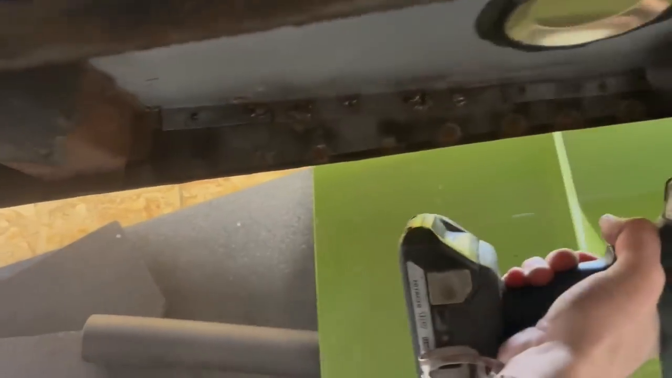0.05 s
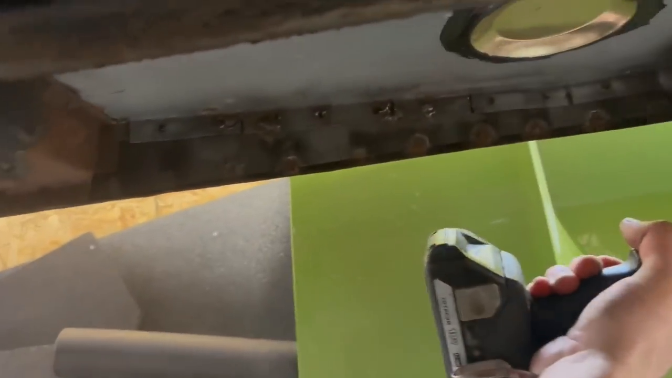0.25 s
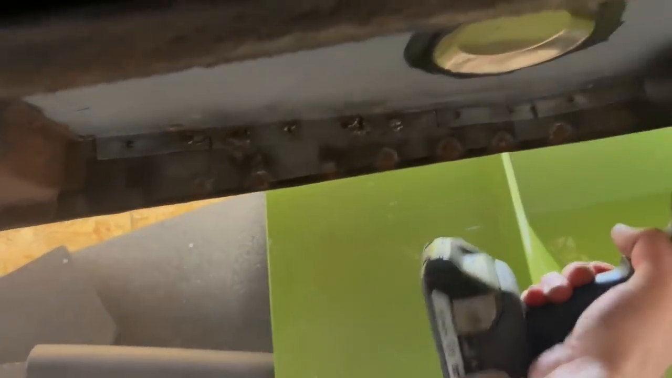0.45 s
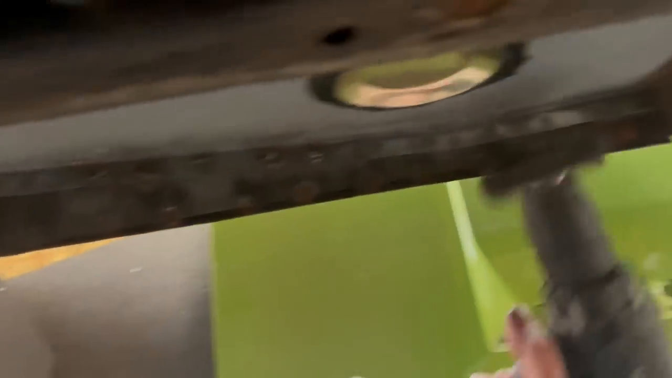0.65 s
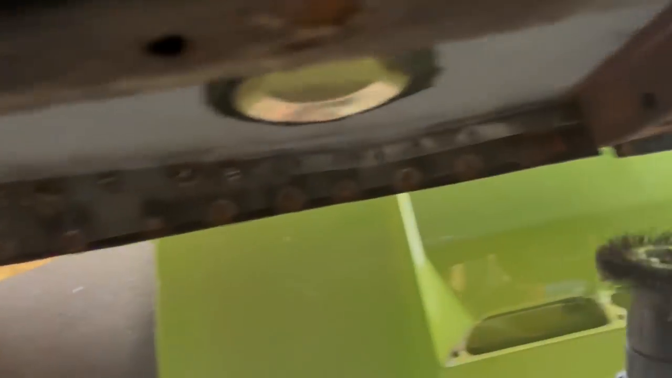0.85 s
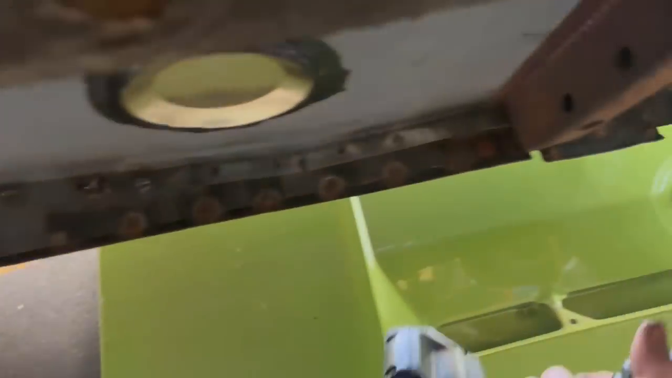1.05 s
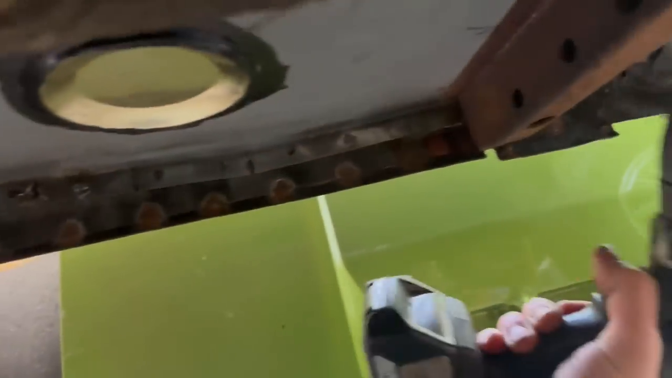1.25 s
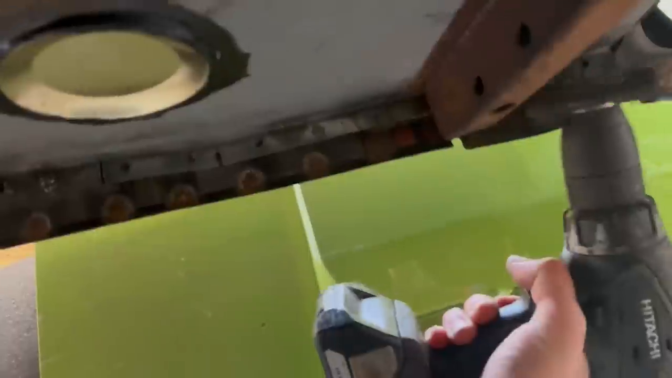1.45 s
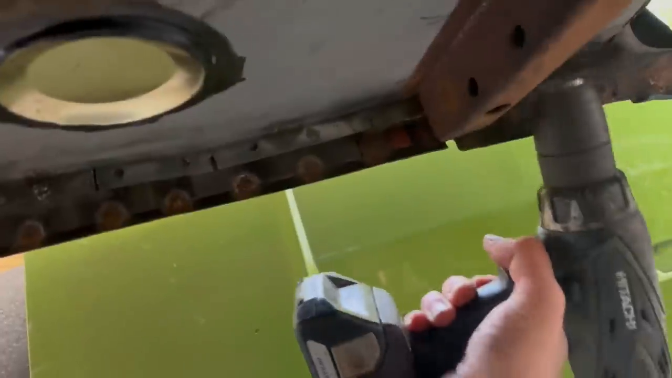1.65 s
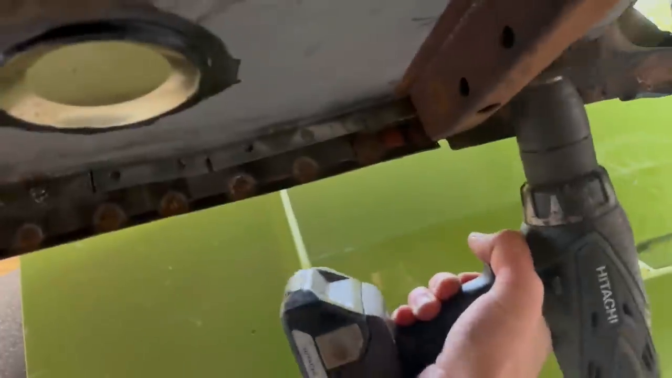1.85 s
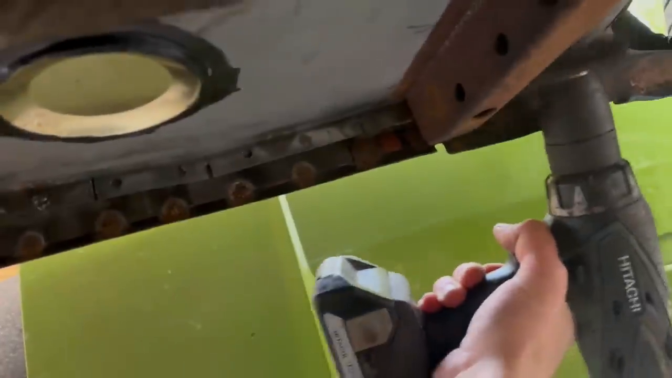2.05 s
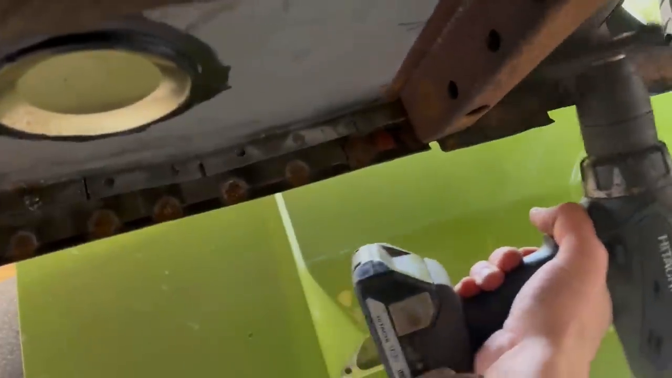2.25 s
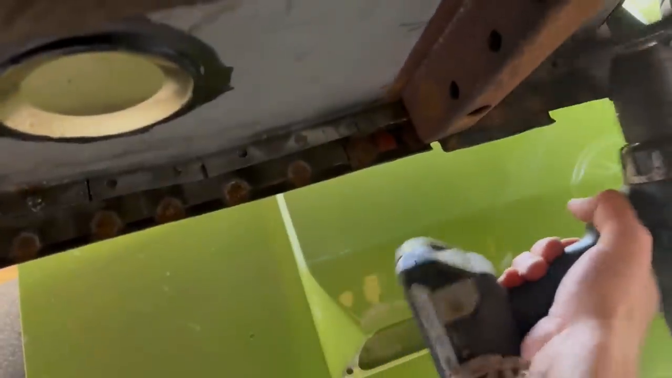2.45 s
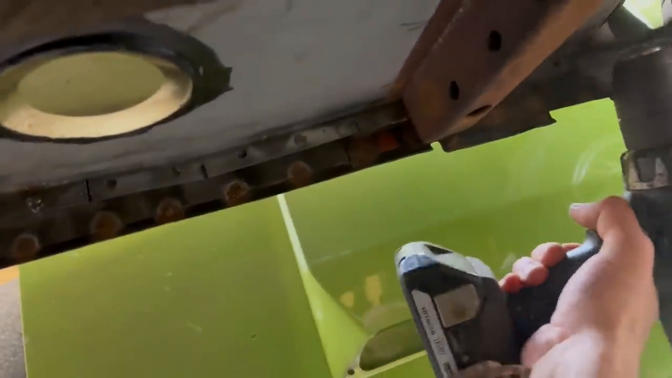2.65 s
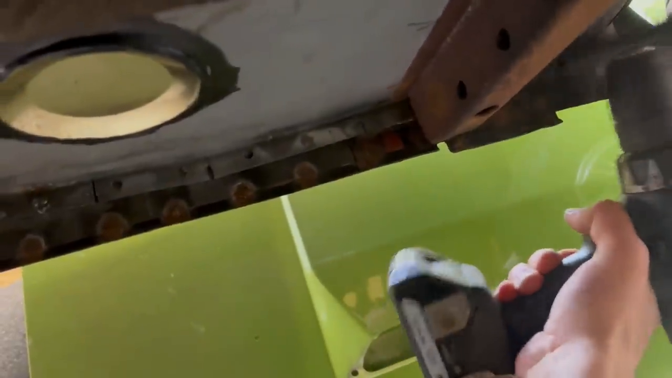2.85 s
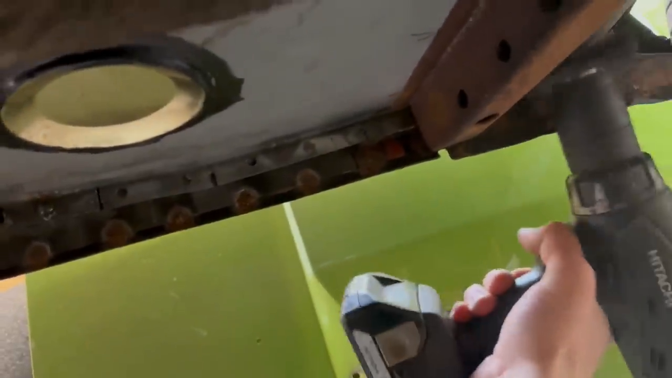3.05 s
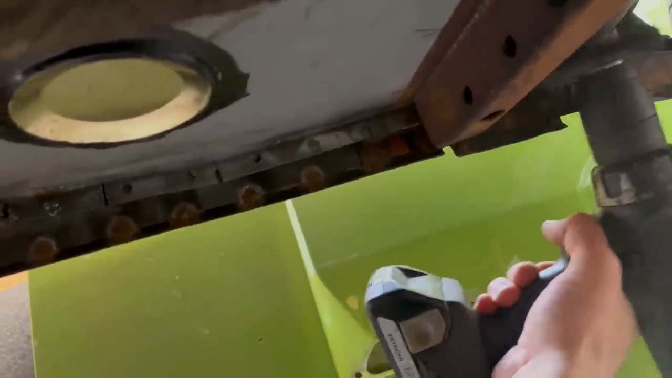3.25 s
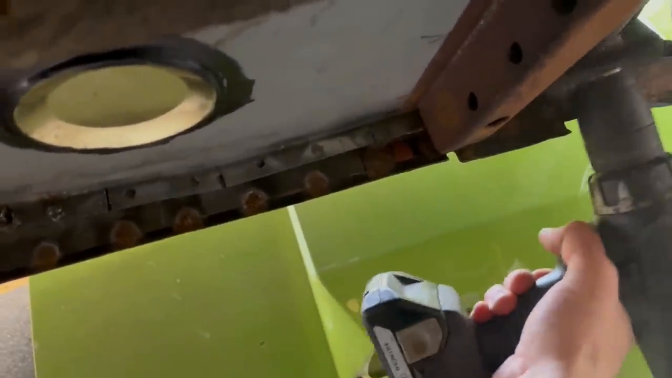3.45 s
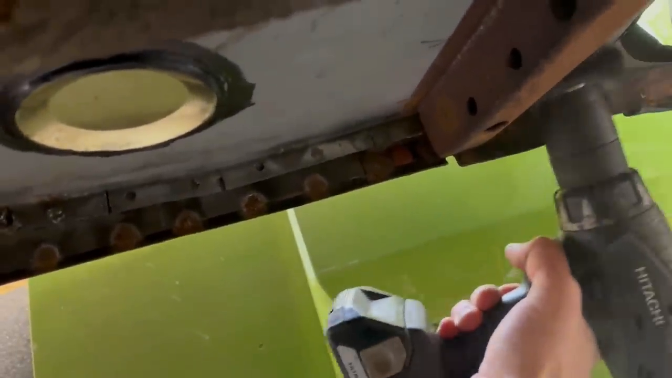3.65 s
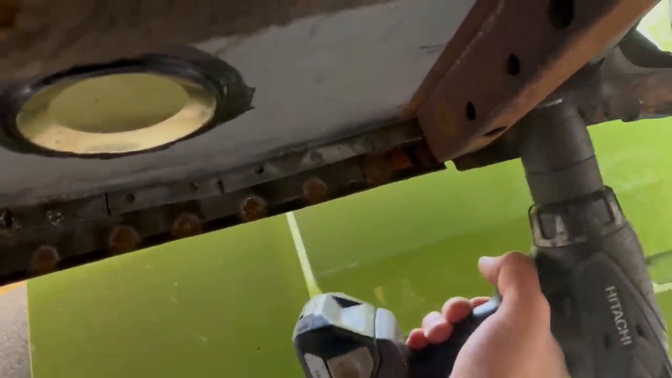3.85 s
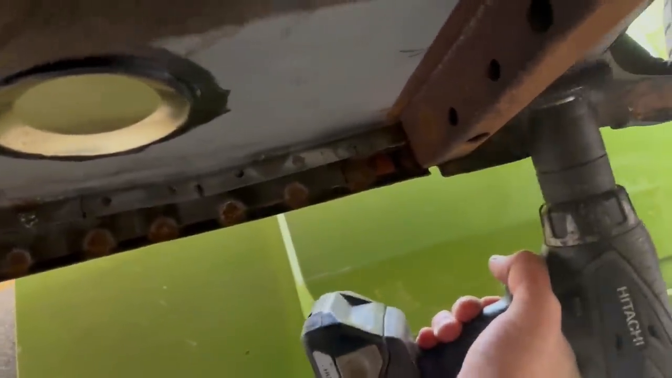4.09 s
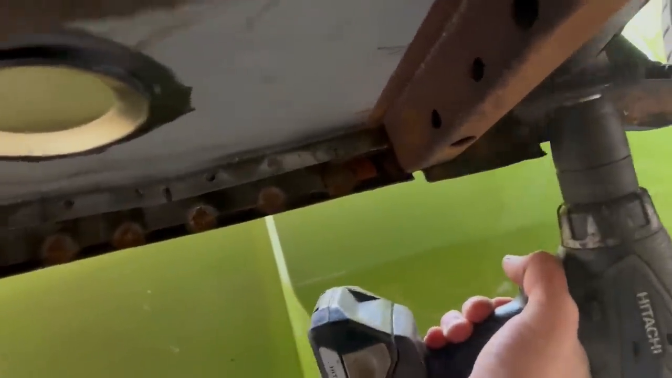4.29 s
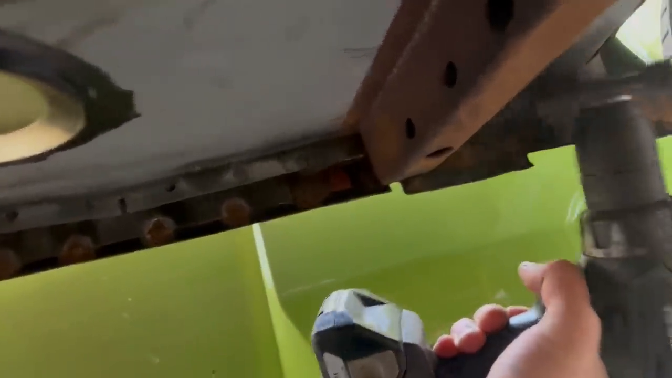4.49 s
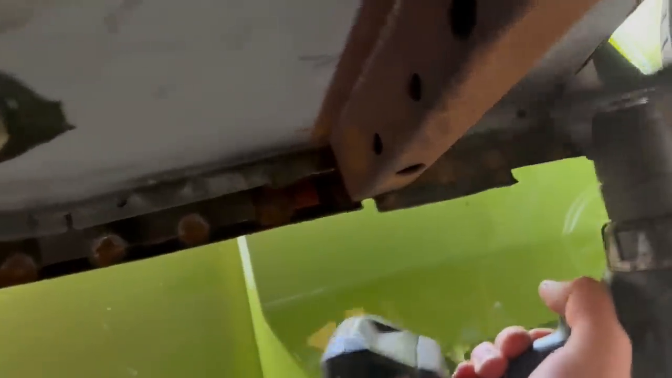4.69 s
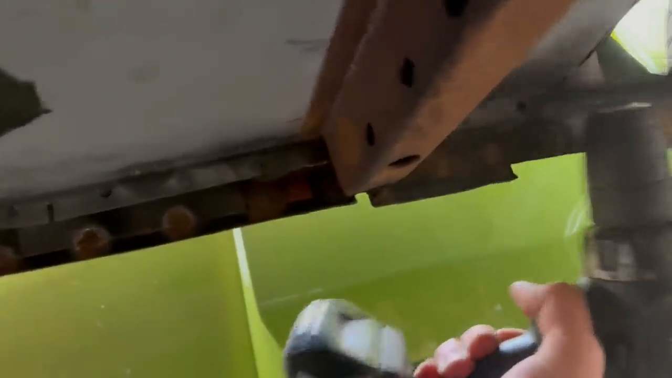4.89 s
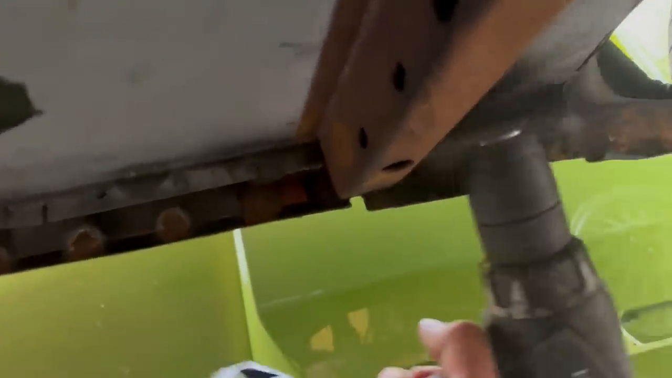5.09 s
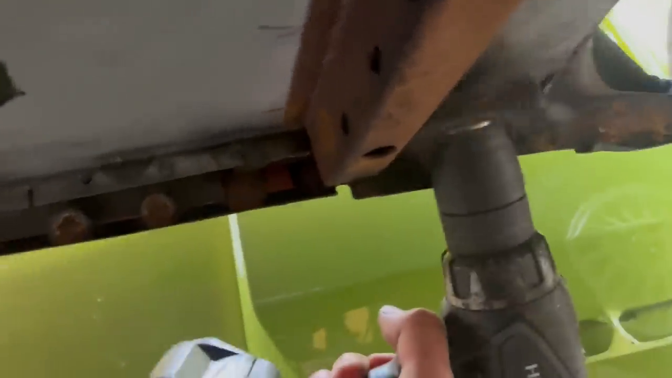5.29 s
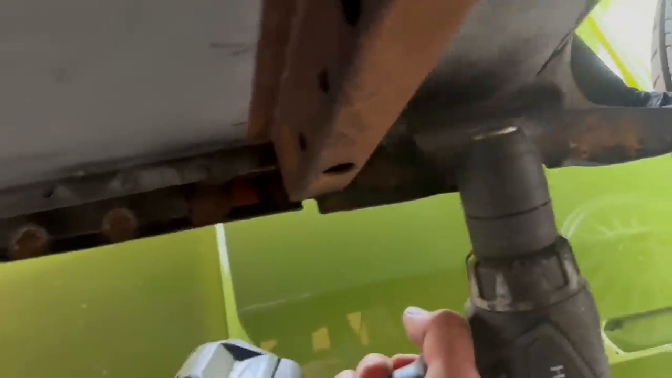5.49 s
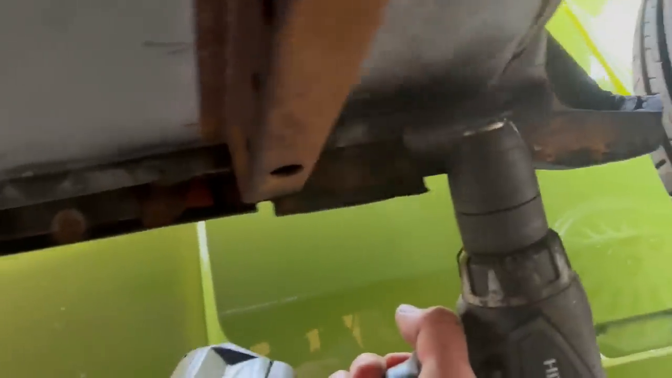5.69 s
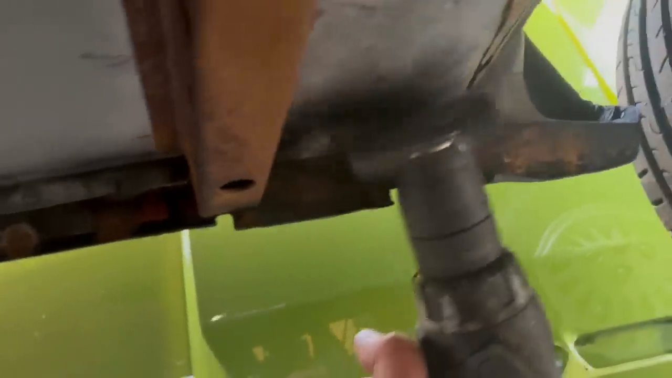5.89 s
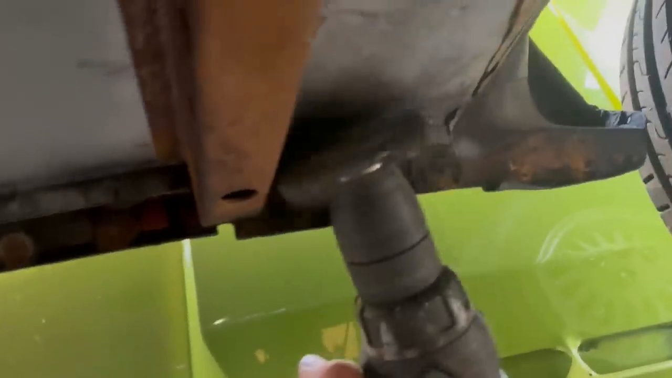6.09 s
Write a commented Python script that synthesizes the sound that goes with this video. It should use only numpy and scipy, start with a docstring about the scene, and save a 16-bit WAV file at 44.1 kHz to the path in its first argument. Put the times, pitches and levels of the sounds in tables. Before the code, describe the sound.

A cordless drill whines as its wire brush scrapes rusty steel under a car, stopping briefly with a clack, then restarting.

```python
"""A whirring, whining drill and the harsh hiss of a wire brush on rusty steel, under a car in a garage.
The cordless drill stops with a clack, ticks as it is moved, and starts again. Its gear teeth make the
whir and whine; the scratching wire tips make the hiss and press harder once a turn. Where the brush
catches an edge, the car's floor panel drums and a thin bracket rings. Two microphone openings (ports)
hear it all, with short echoes between car and floor."""
import sys
import numpy as np
from scipy import signal
from scipy.fft import rfft, irfft, next_fast_len
from scipy.io import wavfile

SR = 44100
rng = np.random.default_rng(int(sys.argv[2]) if len(sys.argv) > 2 else 0)


def to_wav(s):
    """Save 16-bit WAV."""
    ch = np.atleast_2d(s).T  # columns
    pcm = np.round(np.clip(ch, -1, 1) * 32767)  # PCM
    wavfile.write(sys.argv[1], SR, pcm.astype(np.int16))


N = 270333
T = np.arange(N) / SR
FFT_SIZE = next_fast_len(N + SR)
HZ = np.maximum(np.arange(FFT_SIZE // 2 + 1) * SR / FFT_SIZE, 1)
KNOCK_FIRMNESS, CLACK_FIRMNESS = .7, .15   # near 1: mostly one strike; near 0: mostly rattle

# How hard the drill works, one table per trigger pull: (time [s], gear whir [dB], brush hiss [dB])
EFFORT = [
    [(0, -35.5, -28), (.23, -36, -32.5), (.57, -38.5, -31), (.7, -38, -36), (.76, -36.5, -39),
     (.795, -31, -63)],
    [(1.366, -47, -59), (1.41, -44, -50), (1.46, -38.5, -42.5), (1.56, -30, -31.5), (1.62, -32.5, -38.5),
     (1.68, -32.5, -31.5), (1.94, -27.5, -27), (2.08, -31.5, -33.5), (2.27, -36, -30), (2.44, -31, -25.5),
     (2.62, -31.5, -29.5), (2.81, -33.5, -25), (3.09, -34, -29), (4.4, -33, -29), (4.61, -33.5, -24.5),
     (4.8, -33.5, -24), (5.14, -30.5, -27), (5.56, -31.5, -29.5), (5.92, -35, -28), (6.13, -31.5, -28)],
]
# Gear teeth meeting, one table per trigger pull:
# (time [s], tooth rate [Hz], tone at 2 times that rate [dB], at 3 times [dB], at 4 times [dB])
GEAR_TONES = [
    [(0, 1250, -44, -57, -43), (.2, 1247, -35.5, -55, -50), (.4, 1254, -52, -68, -61),
     (.65, 1240, -60, -60, -49), (.79, 1226, -52, -54, -52)],
    [(1.6, 1157, -58, -56, -48), (1.78, 1207, -56, -58, -31), (1.95, 1193, -56, -46, -47),
     (2.07, 1271, -35.5, -36, -48), (2.33, 1215, -36, -52, -57), (2.5, 1162, -45, -29.5, -46),
     (2.65, 1198, -46, -43, -36), (2.9, 1217, -43, -59, -34), (3.07, 1287, -39, -35, -50),
     (3.26, 1240, -34, -38, -41), (3.45, 1240, -37.5, -33, -36), (3.57, 1236, -36, -37, -39),
     (3.68, 1239, -36.5, -46, -36), (3.8, 1253, -35.5, -44, -54), (4.02, 1208, -37, -38, -48),
     (4.14, 1255, -33.5, -36, -37), (4.2, 1268, -37, -42, -40), (4.32, 1264, -32.5, -39, -39),
     (4.45, 1250, -39, -42, -36), (4.63, 1217, -38, -29, -48), (4.87, 1204, -47, -61, -28),
     (5.12, 1168, -47, -53, -47), (5.3, 1250, -38, -33, -53.5), (5.42, 1273, -38.5, -47, -52),
     (5.6, 1270, -45, -48, -52), (5.75, 1268, -36.5, -50, -44), (5.9, 1270, -39, -48, -38),
     (6.02, 1274, -46, -50, -41), (6.13, 1253, -42, -55, -52)],
]
# The brush catches an edge of the floor panel: (start [s], length [s], middle rings [dB],
# upper rings against middle [dB], lowest rings against middle [dB], car body rumble [dB])
EDGE_CATCHES = [(1.889, 0.04, -16.5, -1, 0, -32), (1.935, 0.021, -21, -6, 1, -27.5),
                (2.08, 0.022, -25, 1, 7, -32), (2.51, 0.057, -20, -2, -1, -26.5),
                (2.6, 0.1, -21, -4, 1.5, -25.5), (2.699, 0.04, -23, 4, 4.5, -26),
                (3.93, 0.0085, -40, 12.5, 6, -42), (4.0, 0.0092, -38.5, 11, 1, -36),
                (4.045, 0.009, -43.5, 12, 6, -38), (4.17, .04, -54, 10, -4, -36.5),
                (4.64, 0.011, -32, 5.5, 5, -47), (4.7, 0.05, -16.5, -2.5, -2, -27),
                (4.848, 0.014, -26.5, -9, 4.5, -31.5), (4.95, 0.072, -39.5, 9, 3, -41),
                (5.243, 0.013, -20, -15, -4, -46), (5.3, 0.091, -20, -2, 2.5, -35),
                (5.43, 0.075, -31, 1, 4.5, -34), (6.08, 0.054, -29.5, 3, -4, -45)]
# Clacks of the gears and the chuck (the clamp that holds the brush), and small clacks as the resting drill is
# handled near 1.03, 1.05 and 1.15 s, which also sound as ticks: # (time [s], level [dB], main ring [Hz], its
# rise time [s], thud against level [dB], other rings against level [dB])
DRILL_CLACKS = [(0.802, -5, 1500, .003, -32, -7), (0.8484, -42, 1510, .002, 6.5, -13),
                (0.8864, -54, 1830, .002, -10, -9), (0.9716, -57, 1490, .002, 1, -6),
                (1.0296, -48, 1880, .001, 8, -10), (1.052, -52, 1520, .001, 5, -8),
                (1.1505, -47, 1830, .001, 4, -6), (1.2947, -63, 1700, .002, 15, -5),
                (1.3688, -40, 1690, .002, -4, -3), (1.3983, -46, 1850, .002, -5, -1),
                (1.556, -7, 1717, .013, -44, -26), (1.572, -1, 1600, .0015, -46, -18)]


def from_db(db):
    """Turns decibels into a gain to multiply by."""
    return 10 ** (np.asarray(db) / 20)


def rms_one(x):
    """Scales a sound so that its average size (rms) is 1."""
    return x / np.sqrt(np.mean(x ** 2) + 1e-20)


def gain_curve(pulls, column):
    """Follows one dB column through time, as a gain; silent outside the trigger pulls."""
    return sum(from_db(np.interp(T, rows[:, 0], rows[:, column], -200, -200))
               for rows in map(np.array, pulls))


def over_hz(points):
    """Joins (frequency, value) points into a curve over all frequencies."""
    hz, values = np.transpose(points)
    return np.interp(np.log(HZ), np.log(np.maximum(hz, 1)), values)


def filtered(x, gains):
    """Gives each frequency of a sound its own gain."""
    return irfft(rfft(x, FFT_SIZE) * gains, FFT_SIZE)[..., :N]


def band_rms_one(x, low_hz, high_hz):
    """Scales a sound so that the part between two frequencies has rms 1."""
    band = filtered(x, (HZ > low_hz) & (HZ < high_hz))
    return x / np.sqrt(np.mean(band ** 2))


def drift(rate_hz):
    """Smooth random wandering of about plus or minus 1; a higher rate wanders faster."""
    step = 40   # samples between points
    pole = np.exp(-2 * np.pi * step * rate_hz / SR)
    noise = rng.standard_normal(N // step + 2002)
    slow = signal.lfilter([1], [1, -2 * pole, pole * pole], noise)[2000:]
    return np.interp(np.arange(N) / step, np.arange(len(slow)), rms_one(slow))


def ring(force, hz, width_hz):
    """Lets a force ring at one pitch (a resonance); a smaller width rings longer."""
    pole = np.exp(-np.pi * width_hz / SR)
    gain = (1 - pole * pole) / 2
    feedback = [1, -2 * pole * np.cos(2 * np.pi * hz / SR), pole * pole]
    return signal.lfilter([gain, 0, -gain], feedback, force + 1e-18)


def ring_all(forces, rings):
    """Adds up an object's rings, each with its own force; neighbours swing in opposite directions."""
    return sum((-1) ** k * from_db(db) * ring(forces[k], hz, width)
               for k, (hz, width, db) in enumerate(rings))


def clicks(per_s, spread_db):
    """Clicks at random times; more spread makes their sizes more uneven."""
    sizes = from_db(spread_db * np.minimum(rng.exponential(1, N), 5)) * rng.choice([-1, 1], N)
    return rms_one(sizes * (rng.random(N) < per_s / SR))


def blows(times, levels_db, contact_s, firmness):
    """The force of blows: each is a dull strike and a short rattle that dies away."""
    out, length = np.zeros(N), int(.05 * SR)
    age = np.arange(length) / SR
    rattles = np.sqrt(1 - firmness) * rng.standard_normal((len(times), length)) * np.exp(-age / contact_s)
    strike = np.exp(-2 * np.pi * 2500 * age)   # dull above 2500 Hz
    strike *= np.sqrt(firmness * contact_s * SR / 2) / strike.sum()
    for time, gain, rattle in zip(times, from_db(levels_db), rattles):
        i = round(time * SR)
        out[i:i + length] += gain * (strike + rattle)[:N - i]
    return out


def swell(starts, lengths, levels_db, rise_db_per_s, fall_db_per_s):
    """Gain of events that rise, hold and fall; the loudest one counts."""
    t = T[::16]
    events_db = [db - rise_db_per_s * np.maximum(start - t, 0)
                 - fall_db_per_s * np.maximum(t - start - length, 0)
                 for start, length, db in zip(starts, lengths, levels_db)]
    return np.interp(T, t, from_db(np.max(events_db, axis=0)))


def running():
    """1 while the trigger is pulled, otherwise 0."""
    return sum((T >= pull[0][0]) & (T <= pull[-1][0]) for pull in EFFORT)


def rotation(teeth_per_turn=63.5):
    """Two angles in radians: one goes round once per gear tooth, the other once per chuck turn."""
    times, tooth_hz = np.concatenate(GEAR_TONES).T[:2]
    unsteady_hz = np.interp(T, times, tooth_hz) * (1 + .0015 * drift(15))
    tooth_angle = 2 * np.pi * np.cumsum(unsteady_hz) / SR
    return tooth_angle, tooth_angle / teeth_per_turn


def brush_grabs(half_length_s=0.0091):
    """Extra hiss in dB where the brush bites harder for about half a turn."""
    # Bites into the steel: (middle time [s], hiss level [dB])
    bites = [(0.06, -30), (0.529, -26.5), (0.709, -28), (0.765, -28), (1.569, -25), (1.714, -25.5),
             (2.076, -22.5), (2.304, -24), (2.487, -20.5), (2.56, -18.5), (2.624, -20.5), (2.699, -23),
             (2.871, -20), (2.926, -19), (2.977, -18.5), (3.324, -24.5), (3.954, -24.5), (4.392, -23.5),
             (4.44, -32), (4.644, -16), (4.711, -18), (4.888, -19.5), (4.956, -15), (5.025, -13.5),
             (5.105, -21), (5.202, -23), (5.696, -25), (5.748, -27), (5.929, -24), (6.092, -21)]
    t = T[::16]
    bumps = [from_db(db) * np.exp(-.5 * ((t - time) / half_length_s) ** 2) for time, db in bites]
    biting = np.interp(T, t, np.max(bumps, axis=0))
    steady = gain_curve(EFFORT, 2) + 1e-5
    return 20 * np.log10(np.maximum(biting / steady, 1))


def brush_skips():
    """Short dips in dB where the brush skips off the steel."""
    # Moments of lost contact: (middle time [s], depth [dB], half length [s])
    dips = [(0.783, -15, 0.0068), (1.741, -6, 0.012), (2.602, -1, 0.011), (2.85, -7, 0.0094),
            (2.906, -5, 0.012), (2.958, -8, 0.01), (3.004, -13, 0.012), (4.673, -19, 0.019),
            (4.946, -3, 0.011), (4.986, -26, 0.014), (5.039, -15, 0.013), (5.091, -13, 0.0088),
            (5.13, -5, 0.017)]
    return sum(db * np.exp(-((T - time) / half) ** 2) for time, db, half in dips)


def garage():
    """Still air and a far hum make a quiet background."""
    # Tone colour of the quiet background noise, with a narrow dip near 8200 Hz:
    # (frequency [Hz], level [dB])
    colour = [(71, -35), (120, -24), (238, 9.5), (343, 7), (725, -7), (1760, -6.5), (7400, -22.5),
              (8180, -39), (8870, -13), (15000, -28)]
    level = from_db(-56.5 + 2 * drift(13.0))
    return level * rms_one(filtered(rng.standard_normal(N), from_db(over_hz(colour))))


def gearbox(wobble, grab_db, skip_db, shake):
    """Gear teeth rattle in the drill body over the motor hum; the whir throbs once a turn."""
    # Rings of the drill body: (pitch [Hz], width [Hz], level [dB])
    housing = [(915, 82, 6), (1163, 100, 1), (1570, 490, -0.5), (1870, 290, -9), (2373, 137, 4),
               (4290, 220, -7), (6700, 150, -11)]
    # Tone colour of the whir: (frequency [Hz], level [dB])
    colour = [(40, -31), (300, -44), (700, -11.5), (1000, 2), (1900, 2), (2150, -6.5), (3000, 4.5),
              (5000, -4), (6000, -3), (9000, -24), (16000, -33)]
    brake_s, brake_db_per_s = .797, 270
    teeth = clicks(9000, spread_db=0.0)
    rattle = teeth + sum(from_db(db + 2.0) * ring(teeth, hz, width) for hz, width, db in housing)
    braking = (T > brake_s) * from_db(-35 - brake_db_per_s * np.abs(T - brake_s))
    whir = band_rms_one(filtered(rattle, from_db(over_hz(colour))), 2430, 3240)
    whir *= gain_curve(EFFORT, 1) + braking
    throb_db = 1.5 * wobble + 0.39 * drift(4.9) + .5 * skip_db + 0.18 * np.minimum(grab_db, 10)
    hum = rms_one(ring(ring(teeth, 150, 540), 150, 540))
    hum *= running() * np.hypot(from_db(-42.5), from_db(-8) * shake)   # swells as the car body shakes
    return from_db(throb_db - 3.0) * whir + from_db(1.3 * drift(10.0)) * hum


def brush(wobble, grab_db, skip_db):
    """Thousands of wire tips scratch; the off-centre brush presses harder once a turn."""
    # Tone colour of the hiss: (frequency [Hz], level [dB])
    colour = [(500, -6.5), (1000, 2.5), (2000, -3), (4500, -0.5), (6000, -5.5), (7000, -0.5), (8300, -4),
              (10000, 0.5), (12500, -1), (14500, -1.5), (16000, -6)]
    pressure_db = np.maximum(grab_db, 0.5 * wobble + 2.25 * drift(18.5) + 0.5)
    level = (gain_curve(EFFORT, 2) + 1e-5) * from_db(pressure_db + skip_db)
    tips = filtered(clicks(12000, spread_db=2.0), from_db(over_hz(colour)))
    return level * band_rms_one(tips, 7600, 18000)


def gear_whine(tooth_angle, chuck_angle, skip_db):
    """Meeting teeth sing three tones that throb once and twice a turn and dip when the brush skips."""
    # The speed sags once a turn, and the teeth meet a little unevenly.
    phase = tooth_angle - .2 * np.cos(chuck_angle) + .08 * drift(90)
    throb_db = 2 * np.sin(chuck_angle) + 5 * np.sin(2 * chuck_angle)
    tones = 0
    for multiple, throb_share in ((2, 1), (3, 1), (4, .5)):
        level = gain_curve(GEAR_TONES, multiple) * from_db(drift(30) + throb_share * throb_db)
        tones += level * np.sin(multiple * phase)
    return from_db(3.0 + .5 * skip_db) * tones


def body_shake():
    """How much the brush's catches shake the car body, as a gain."""
    starts, lengths, *_, rumble_db = np.transpose(EDGE_CATCHES)
    return swell(starts, lengths, rumble_db, rise_db_per_s=262, fall_db_per_s=58)


def car_body(shake):
    """The car body rumbles softly, and more when the running drill, a catch or a clack shakes it."""
    # Deep rings of the body: (pitch [Hz], width [Hz], level [dB])
    rings = [(53, 13, -5), (61.5, 3.9, 4.5), (73, 14.7, -2.5), (106, 10, -4.5), (136, 43, -5.5)]
    running_db, idle_db = -48, -54
    rumble = ring_all([clicks(600, spread_db=3.5)] * len(rings), rings)
    times, level_db, _, _, thud_db, _ = np.transpose(DRILL_CLACKS)
    thuds = swell(times, np.zeros_like(times), level_db + thud_db - 9, 400, 200)
    steady = from_db(np.where(running(), running_db + 2.0 * drift(9.8), idle_db))
    return rms_one(rumble) * np.maximum.reduce([steady, shake, thuds])


def whistle():
    """A thin, fluttering tone from the drill comes and goes."""
    # Sliding tones: (start [s], length [s], first pitch [Hz], last pitch [Hz], level [dB])
    slides = [(.55, 0.16, 4440, 4700, -40), (.768, .015, 410, 403, -41), (1.403, 0.021, 430, 452, -38.5),
              (3.304, 0.2, 4480, 4380, -39)]
    waver = 1 + 0.0097 * drift(40.0)
    flutter = from_db(5.7 * drift(30))
    out = 0
    for start, length, first_hz, last_hz, db in slides:
        hz = np.interp(T, [start, start + length], [first_hz, last_hz]) * waver
        out += swell([start], [length], [db], 500, 500) * np.sin(2 * np.pi * np.cumsum(hz) / SR)
    return flutter * out


def chuck_clacks():
    """Each clack is a main ring that swells and dies, the chuck's other rings and a thud of the tool."""
    # Rings that every clack shares: (pitch [Hz], width [Hz], level [dB])
    rings = [(990, 120, -3), (1300, 120, -6), (1500, 110, -3), (1575, 120, -5), (1850, 140, 1),
             (2100, 200, -8), (2750, 250, -9), (3300, 400, -10), (3840, 150, -6), (4100, 200, -3),
             (5800, 500, -11), (11000, 3000, -12)]
    times, level_db, main_hz, rise_s, thud_db, rings_db = np.transpose(DRILL_CLACKS)
    decay_s = 0.0047   # the main ring is damped as soon as the parts settle
    age = np.arange(int(.05 * SR)) / SR
    out = np.zeros(N)
    for time, db, hz, rise in zip(times, level_db, main_hz, rise_s):
        i = round(time * SR)
        envelope = np.where(age < rise, (age / rise) ** 2.8, np.exp((rise - age) / decay_s))
        out[i:i + len(age)] += from_db(db) * envelope * np.sin(2 * np.pi * hz * age)
    for hz, width, db in rings:
        force = blows(times, level_db + rings_db + db + 11.5, contact_s=0.0098, firmness=CLACK_FIRMNESS)
        out += ring(force, hz, width)
    jolt = blows(times, level_db + thud_db + 22.0, contact_s=0.02, firmness=CLACK_FIRMNESS)
    thud = ring(ring(jolt, 310, 260), 300, 220)
    deep_thud = ring(ring(jolt, 154, 90), 154, 90)
    return out + thud + from_db(-3.5) * deep_thud


def handling_ticks(width_hz=360):
    """The resting drill is handled: each tick is a short rattle in two rings of its plastic shell."""
    # Ticks: (time [s], strength [dB], lower ring [Hz], upper ring [Hz], upper against lower [dB])
    ticks = [(0.872, -36, 1500, 4100, -10), (1.0294, -43, 1880, 2400, -3), (1.052, -44.5, 1280, 3020, 2),
             (1.1502, -43, 890, 1880, 5.5), (1.163, -45, 1500, 1800, 7)]
    out = 0
    for time, db, lower_hz, upper_hz, upper_db in ticks:
        force = blows([time], [db + 14.5], contact_s=0.011, firmness=CLACK_FIRMNESS)
        out += ring(force, lower_hz, width_hz) - from_db(upper_db) * ring(force, upper_hz, width_hz)
    return out


def coasting_gears(width_hz=220):
    """After the stop, the loose gears tick faintly and ring in the drill body."""
    # Bursts of ticking: (start [s], length [s], level [dB], pitch [Hz])
    bursts = [(.885, .05, -60, 4120), (.975, .03, -66, 3450), (.97, .07, -72, 4150), (1.1, .02, -73, 4130),
              (1.06, .04, -72, 3250)]
    teeth = clicks(900, spread_db=2.0)
    out = 0
    for start, length, db, hz in bursts:
        ticking = rms_one(ring(ring(teeth, hz, width_hz), hz, 2 * width_hz))
        out += ticking * swell([start], [length], [db], 600, 150)
    return out


def housing_chatter():
    """The drill body chatters: taps ring briefly in its rings near 920 Hz; the light taps are random and follow
    the hiss."""
    # The hardest taps: (time [s], strength [dB])
    hard_taps = [(3.034, -21), (3.108, -19), (3.204, -29), (3.309, -25), (3.462, -27), (3.514, -27),
                 (3.653, -26), (3.689, -27), (3.874, -29), (3.914, -19)]
    # Rings of the drill body that the taps set off: (pitch [Hz], width [Hz], level [dB])
    rings = [(924, 107, 0), (1173, 220, -4), (1460, 310, -5)]
    rough_seam_s = 1.6   # from here on the brush is pressed to a rougher seam
    times, level_db = np.transpose(hard_taps)
    light = from_db(9) * gain_curve(EFFORT, 2) * (T > rough_seam_s) * clicks(90, spread_db=2.3)
    hard = blows(times, level_db + 19.5, contact_s=0.0051, firmness=KNOCK_FIRMNESS)
    return ring_all([light + hard] * len(rings), rings)


def floor_panel():
    """Wire tufts drum and the brush hub knocks; where the brush sits decides which rings are loud."""
    # The hub hits the panel: (time [s], strength for the middle rings [dB],
    # clank against middle [dB], upper against middle [dB], lowest against middle [dB])
    knocks = [(1.854, -18.5, -3, -15, 3), (1.887, -6, -0.5, -11, -2.5), (1.905, -11, -3, -7, -1),
              (1.945, -15.5, -3, 2.5, 11), (2.077, -23.5, 19, 14, -1), (2.091, -20.5, 14, 14, -5),
              (2.112, -21.5, 0, 4, 0), (2.503, -14.5, 1, 0.5, 9), (2.535, -11, -18, -12, 4),
              (2.551, -13.5, 0, -7, 4.5), (2.565, -14.5, 1, 3, -1), (2.579, -18, -2, 1, -4),
              (2.735, -20, -1, 5, -1), (2.75, -13.5, 2, -5, 0), (4.687, -12.5, -5, -2, 6),
              (4.703, -11, 2.5, -1, 0), (4.718, -16, -8, 1, -7), (4.737, -13, -10, -6, -13),
              (4.848, -14.5, 3.5, 1, -4), (5.241, -14, -2, -8, 1.5), (5.293, -11, -1.5, -9, -8),
              (5.385, -9, -3, -8, -8), (5.439, -14, 2, -6, -7.5), (5.493, -17, 8, 4, 0),
              (6.084, -17, -4, -12, -8)]
    # Rings of the panel: (pitch [Hz], width [Hz], level [dB])
    rings = [(220.4, 5, 6), (239.8, 25.6, 0.5), (300, 51, -2.5), (354, 104, -6), (551, 60, -0.5),
             (578.5, 24, 0.5), (622.5, 23.6, 2.5), (691, 103, -5.5), (858, 29, -2.5), (923, 29, 3),
             (966, 55, -0.5), (1094, 42, -0.5), (1323, 123, -6), (1462, 46, -1), (1584, 110, -6),
             (1785, 100, -10), (1960, 100, -11.5), (2320, 150, -21)]
    times, knock_db, clank_db, upper_db, lowest_db = np.transpose(knocks)
    starts, lengths, drum_db, drum_upper_db, drum_lowest_db, _ = np.transpose(EDGE_CATCHES)
    tufts = clicks(1500, spread_db=3.0) * from_db(18.5)

    def push(extra_drum_db, extra_knock_db, contact_s):
        """Drumming plus knocks for one group of rings."""
        drumming = tufts * swell(starts, lengths, drum_db + extra_drum_db, 700, 221)
        return drumming + blows(times, knock_db + extra_knock_db, contact_s, KNOCK_FIRMNESS)

    middle = push(0, 23.5, contact_s=0.0035)
    clank = push(drum_upper_db, clank_db + 22.5, contact_s=0.0038)
    upper = push(drum_upper_db, upper_db + 23.5, contact_s=0.0044)
    lowest = push(drum_lowest_db, lowest_db + 22.0, contact_s=0.0062)
    forces = [lowest if hz < 430 else middle if hz < 780 else clank if hz < 1180 else upper
              for hz, _, _ in rings]
    return ring_all([force * from_db(1.85 * drift(11.7)) for force in forces], rings)


def bracket(grab_db, skip_db):
    """Wires rake a thin bracket; as they wander, its high rings come and go."""
    # Strokes across the bracket: (start [s], length [s], strength [dB])
    rakes = [(2.48, 0.1, -31.5), (2.62, .06, -31.5), (2.675, 0.204, -29.5), (2.91, 0.1, -35),
             (4.56, 0.1, -32), (4.7, 0.09, -29), (4.81, 0.13, -26.5), (4.941, .035, -26), (5.01, .03, -30)]
    # Rings of the bracket: (pitch [Hz], width [Hz], level [dB])
    rings = [(3670, 106, -6), (4270, 63, 1.5), (4500, 70, 2), (4590, 90, -2), (4816, 65, 3),
             (5040, 130, -2), (5190, 170, -4.5), (5370, 250, -8.5)]
    raking = swell(*np.transpose(rakes), rise_db_per_s=128, fall_db_per_s=300)
    force = clicks(5000, spread_db=3.5) * raking
    force *= from_db(20.0 + 0.5 * grab_db * running() + 2 * drift(25) + 0.69 * skip_db)
    return ring_all([force * from_db(3.3 * drift(9.3)) for _ in rings], rings)


def thumps(pitch_hz=104, fade_60_db_s=0.073):
    """Something soft bumps the car body and sets off one low ring that dies quickly."""
    # Bumps: (time [s], level [dB])
    bumps = [(4.1, -20), (4.136, -17)]
    out = 0
    for time, db in bumps:
        age = np.maximum(T - time, 0)
        out += from_db(db - 60 * age / fade_60_db_s) * np.sin(2 * np.pi * pitch_hz * age)
    return out


def microphone_ports(scrape, tones, clacks, places=20, fade_60_db_s=0.21):
    """Two ports hear the direct sound plus echoes under the car, which change as the tool moves."""
    # Share of the sound that differs between left and right; almost none near 8300 Hz:
    # (frequency [Hz], share of the power [0-1])
    differing_share = [(30, .2), (80, .15), (300, .3), (800, .5), (1500, .45), (3500, .45), (5400, .7),
                       (7000, .4), (8300, .06), (10000, .3), (15000, .25)]
    # How far the wave at the left port is ahead: (frequency [Hz], lead [radians])
    left_lead = [(0, 0), (600, 0), (1100, -.9), (1550, -2.1), (1850, .2), (3000, .9), (4400, .4),
                 (5700, -.6), (6700, -1.5), (8300, -3.14), (10200, -4.8), (12500, -6.55), (15500, -9.4)]
    # How much louder the left port is: (frequency [Hz], left minus right [dB])
    balance = [(60, -1.5), (110, 1.5), (200, -2), (380, 3), (700, 1.5), (1290, 0), (2380, 1.5), (4400, 3.5),
               (8120, 0.5), (15000, -0.5)]
    share = np.clip(over_hz(differing_share), 0, 1)
    side = np.array([[.5], [-.5]])   # left, right
    phase_shift = np.exp(1j * side * np.interp(HZ, *np.transpose(left_lead)))
    heard = np.sqrt(1 - share) * phase_shift * rfft(scrape + tones + clacks, FFT_SIZE)
    echoing = scrape + from_db(-6) * tones + from_db(-17) * clacks   # nearer sounds echo less
    age = np.arange(int(.5 * SR)) / SR
    position = np.arange(N) / N * (places - 1)
    for place in range(places):
        echoes = rng.standard_normal((2, len(age))) * from_db(-60 * age / fade_60_db_s)
        echoes /= np.sqrt(np.sum(echoes ** 2, axis=1, keepdims=True))
        nearness = np.cos(np.pi / 2 * np.clip(position - place, -1, 1))   # fades from place to place
        heard += np.sqrt(share) * rfft(echoes, FFT_SIZE) * rfft(nearness * echoing, FFT_SIZE)
    return irfft(heard * from_db(side * over_hz(balance)), FFT_SIZE)[:, :N]


def scene():
    """Drill, brush and car over the still garage, heard in stereo."""
    tooth_angle, chuck_angle = rotation()
    wobble = np.sin(chuck_angle)   # the brush sits off-centre
    shake, grab_db, skip_db = body_shake(), brush_grabs(), brush_skips()
    scrape = garage() + gearbox(wobble, grab_db, skip_db, shake) + brush(wobble, grab_db, skip_db)
    scrape += floor_panel() + car_body(shake)
    tones = bracket(grab_db, skip_db) + housing_chatter() + gear_whine(tooth_angle, chuck_angle, skip_db)
    tones += whistle() + coasting_gears() + thumps()
    clacks = chuck_clacks() + handling_ticks()
    return microphone_ports(scrape, tones, clacks)


def record(dry):
    """Rounds off the loudest peaks and steeply cuts the highest treble."""
    rounded = 1.351 * np.tanh(dry / 1.249)
    treble_cut = signal.cheby2(18, 70, 16200, fs=SR, output="sos")   # 70 dB down from 16200 Hz up
    return signal.sosfilt(treble_cut, rounded)


dry = scene()
out = record(dry)
to_wav(out)
```